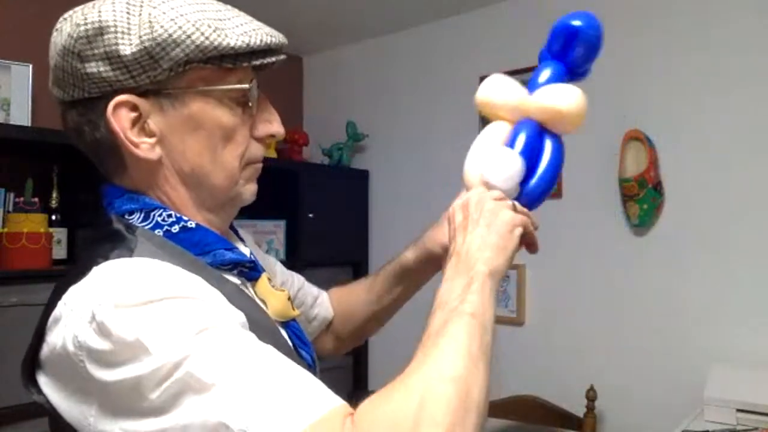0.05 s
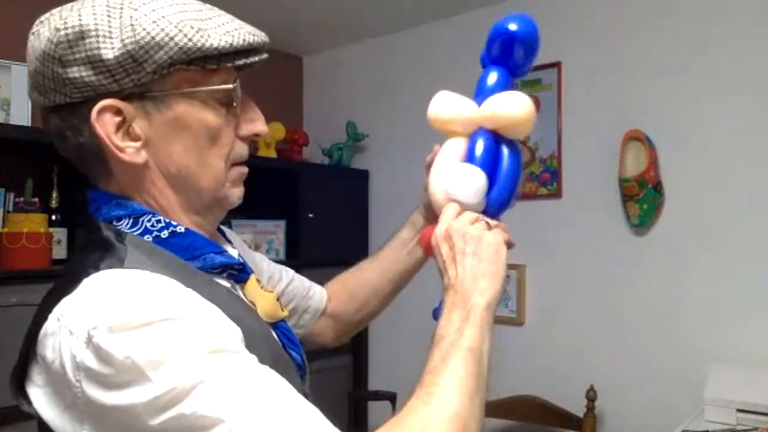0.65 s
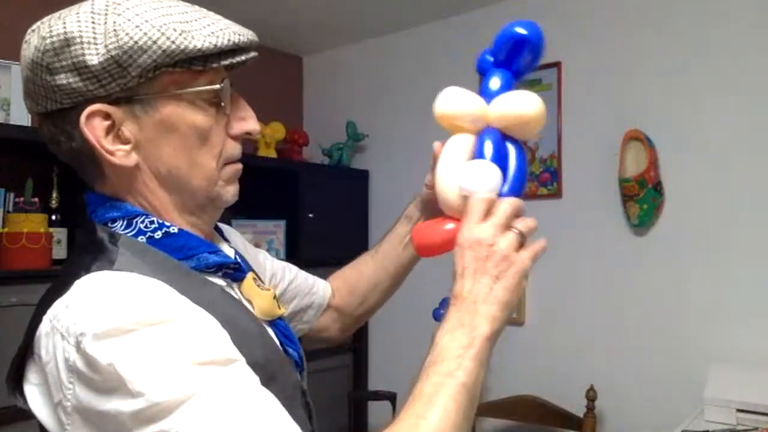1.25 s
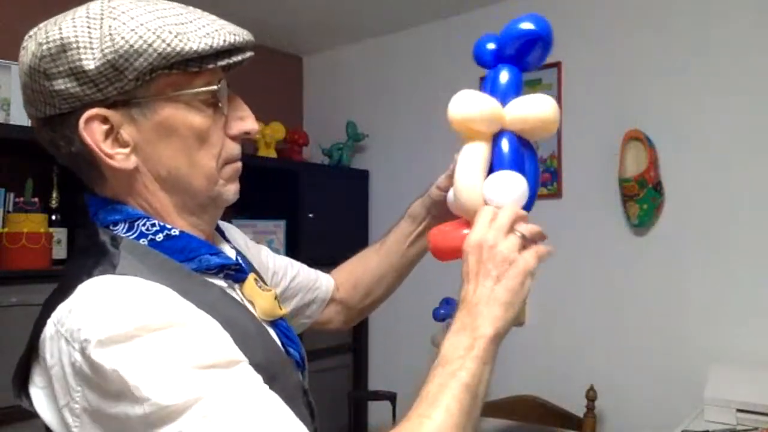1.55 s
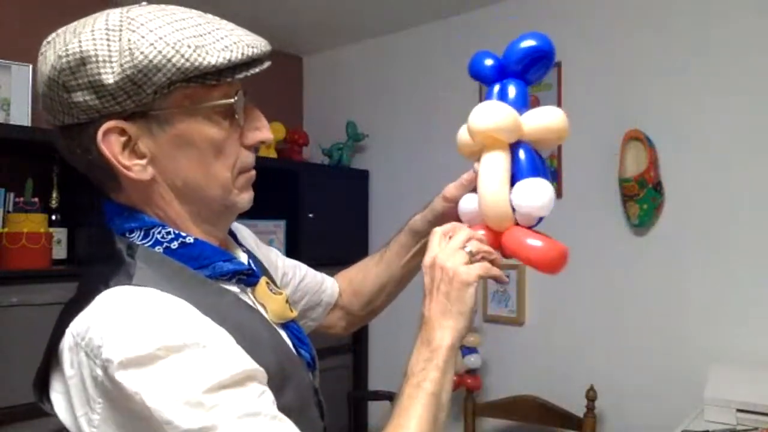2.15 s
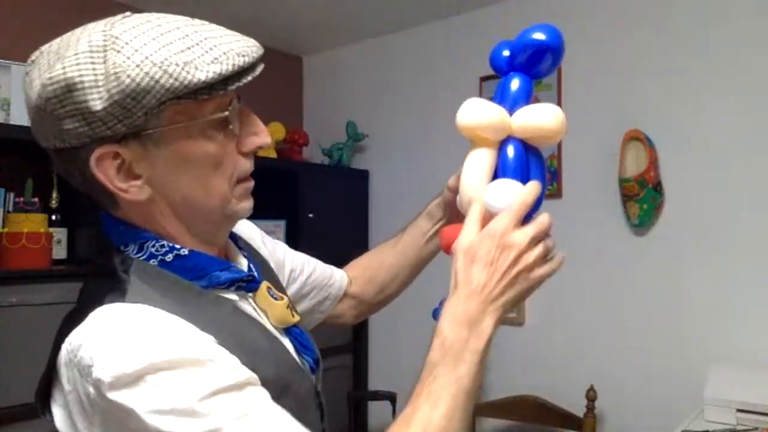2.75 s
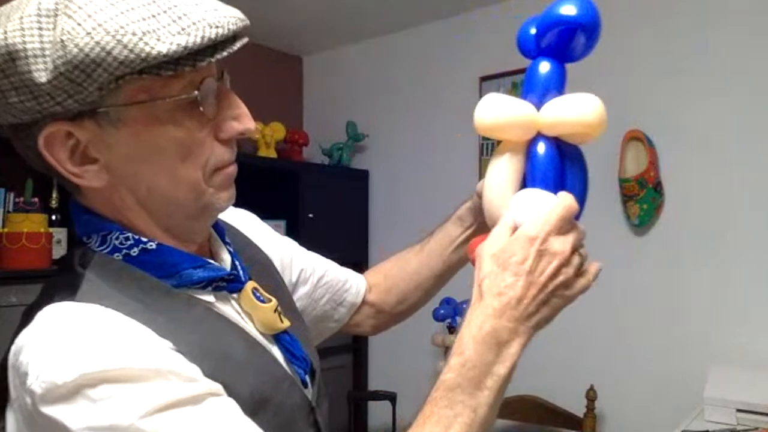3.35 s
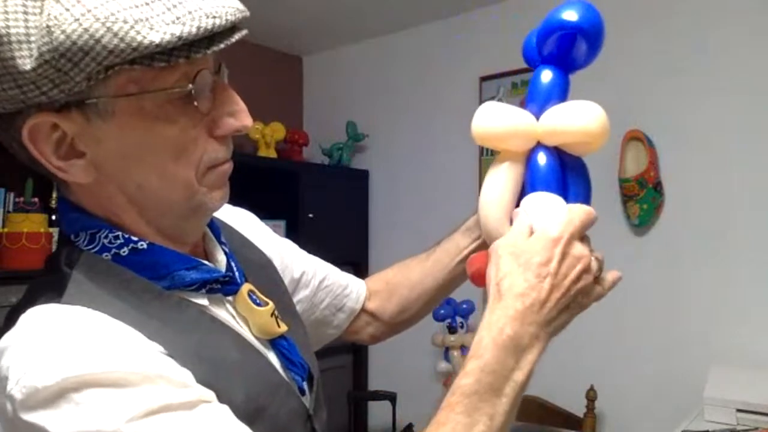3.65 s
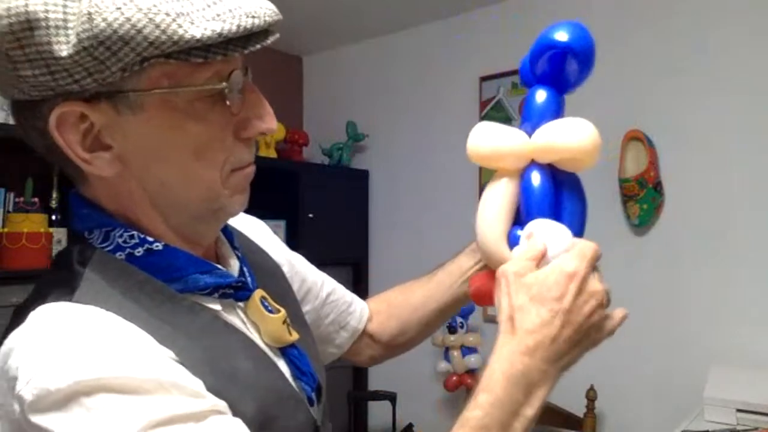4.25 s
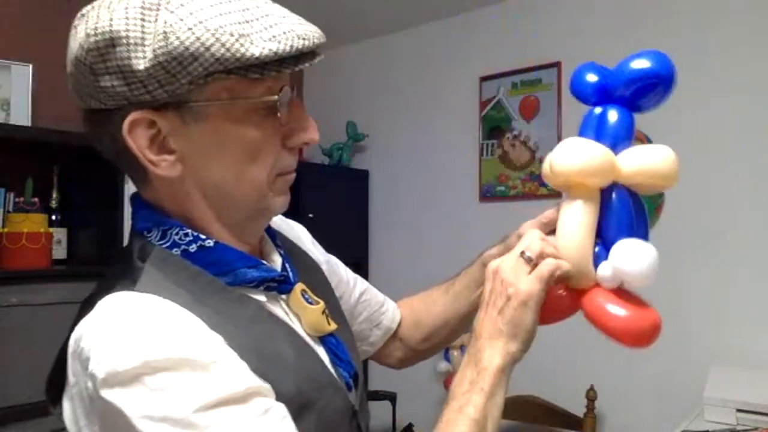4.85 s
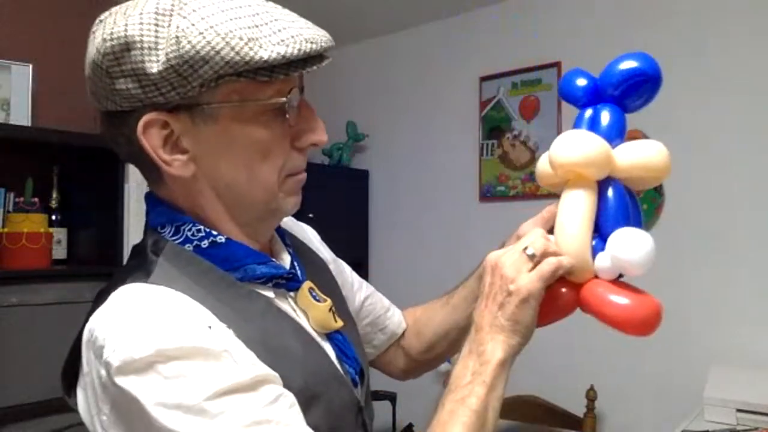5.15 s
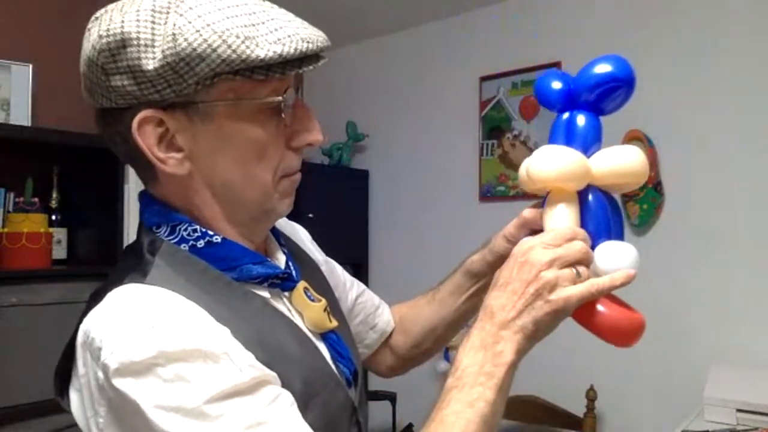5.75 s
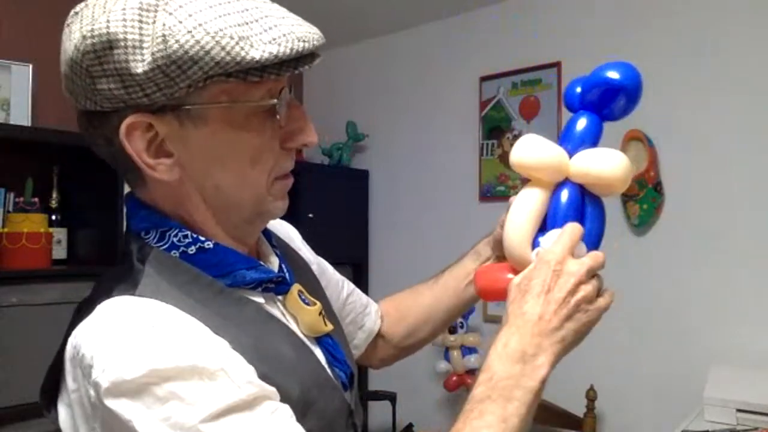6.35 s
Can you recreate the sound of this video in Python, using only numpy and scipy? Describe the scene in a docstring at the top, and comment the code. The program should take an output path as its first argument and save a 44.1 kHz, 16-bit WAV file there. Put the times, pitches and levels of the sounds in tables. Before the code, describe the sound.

Latex balloons rub against each other nearby as someone works them into a figure. Scratchy squeaks and hollow creaks come in stops and starts, mixed with quick chirps, some high and some low, and sharp little slips. Short pauses separate the twists, and the handling is busier in the second half. The small room is otherwise quiet and has a slight echo.

```python
"""Latex balloons squeak and creak as hands twist and press a balloon figure nearby, in a small room.
Latex sticks and slips on latex hundreds of times a second; each slip rings the skin and the air inside.
A light touch squeals, a hard grip slows to a creak, and stuck spots let go in sudden jerks.
The walls add a short echo, and a faint hush lies behind it all."""
import sys
import numpy as np
from scipy import signal
from scipy.fft import rfft, irfft
from scipy.io import wavfile
from scipy.ndimage import uniform_filter1d

SR = 44100
rng = np.random.default_rng(int(sys.argv[2]) if len(sys.argv) > 2 else 0)


def to_wav(sig):
    """Store sig (one row per channel, or 1-D mono) as 16-bit WAV at the path in sys.argv[1].

    Samples outside -1..1 are clipped; the rate is SR.
    """
    pcm = np.clip(np.atleast_2d(sig), -1, 1) * 32767
    pcm = np.round(pcm).astype(np.int16)
    wavfile.write(sys.argv[1], SR, pcm.T)  # frames by channels


N = 282240
TIME = np.arange(N) / SR


def gain_of(db):
    """Turns decibels into a number to multiply a sound by."""
    return 10 ** (np.asarray(db) / 20)


def unit_level(x):
    """Scales a sound to an average power of 1."""
    return x / np.sqrt(np.mean(x ** 2) + 1e-20)


def power(x, seconds):
    """How strong a sound is at each moment: its square, averaged over a short time."""
    return np.abs(uniform_filter1d(x ** 2, max(int(seconds * SR), 1))) + 1e-14


def look_up(table, hz):
    """Reads between the rows of a (pitch_hz, value) table, with octaves evenly spaced."""
    pitches_hz, values = np.transpose(table)
    return np.interp(np.log(hz + 1), np.log(pitches_hz + 1), values)


def wander(per_s):
    """A smooth random curve that changes about per_s times a second."""
    hz = np.fft.rfftfreq(N, 1 / SR)
    return unit_level(irfft(rfft(rng.standard_normal(N)) * np.exp(-(hz / per_s) ** 2), N))


def blend(a, b, share):
    """Mixes two unrelated sounds; share is how much of the power comes from b."""
    return np.sqrt(1 - share) * a + np.sqrt(share) * b


def resonate(x, hz, width_hz):
    """Makes a sound ring at a moving pitch; a smaller width rings longer."""
    turn = np.exp(2j * np.pi * np.cumsum(hz) / SR)
    fade = np.exp(-np.pi * width_hz / SR)
    return (turn * signal.lfilter([np.sqrt(2 * (1 - fade * fade))], [1, -fade], x / turn + 1e-18)).real


def add_ring(x, pitches_hz, width_hz, share):
    """Moves a share of a sound's power into a few ringing pitches, keeping its level."""
    ring = sum(resonate(x, hz, width_hz) for hz in pitches_hz)
    target = power(x, .03)
    mix = blend(x, ring * np.sqrt(target / power(ring, .03)), share)
    return mix * np.sqrt(target / power(mix, .03))


# The tone of the room's hush. Columns: pitch_hz, relative_db
HUSH_TONE = [(30, -22), (250, -8), (1000, -2), (16000, -15)]
def room_hush(level_db=-56.5):
    """The quiet room: faint, steady noise."""
    tone = gain_of(look_up(HUSH_TONE, np.fft.rfftfreq(N, 1 / SR)))
    return gain_of(level_db) * unit_level(irfft(rfft(rng.standard_normal(N)) * tone, N))


# How long the echo takes to fade by 60 dB. Columns: pitch_hz, fade_s
ECHO_FADES = [(150, 0.16), (1000, 0.21), (4000, 0.2), (14000, 0.15)]
def room_echo(x, first_s=0.0019, bounces_per_s=3000, patterns=5, changes_per_s=28):
    """Sound bounces off the walls and dies away; the pattern of bounces changes as the figure moves."""
    echo, size = np.zeros(N), SR // 2
    for k in range(patterns):
        signs = rng.choice([-1., 1.], size)
        bounces = signs * (rng.random(size) < bounces_per_s / SR) * (TIME[:size] > first_s)
        hz, t, bands = signal.stft(bounces, SR, nperseg=256)
        fade = gain_of(-60 * t / look_up(ECHO_FADES, hz)[:, None])
        tail = signal.istft(bands * fade, SR, nperseg=256)[1]
        away = np.abs((changes_per_s * TIME - k + patterns / 2) % patterns - patterns / 2)
        weight = np.cos(np.pi / 2 * np.minimum(away, 1))  # each pattern fades into the next
        echo += signal.oaconvolve(x * weight, tail / np.linalg.norm(tail))[:N]
    return echo


# Moments when a balloon sings one note. Columns: start_s, length_s, pitch_hz, level_db
SQUEALS = [(0.522, 0.053, 3500, -42.5), (0.673, 0.03, 3590, -29.5), (0.742, 0.028, 1390, -17.5),
           (0.883, 0.049, 3380, -29.5), (0.91, 0.031, 1770, -24), (1.1, 0.039, 1109, -26),
           (1.156, 0.028, 3770, -31.5), (1.283, .02, 584, -41.5), (1.671, 0.024, 1049, -27),
           (1.961, 0.036, 3200, -36), (2.263, 0.033, 2733, -39.5), (2.419, 0.041, 2800, -37.5),
           (3.59, 0.047, 287, -31), (4.02, 0.035, 2300, -28), (4.045, 0.03, 255, -29),
           (4.187, 0.061, 3780, -25.5), (4.19, 0.059, 860, -27), (4.67, 0.029, 395, -28.5),
           (4.53, 0.053, 1240, -23.5), (5.072, 0.048, 233, -27), (5.498, 0.023, 3180, -34),
           (5.649, 0.051, 232, -28.5), (6.01, 0.035, 3170, -32.5), (6.018, 0.029, 4600, -29),
           (6.074, 0.043, 580, -22)]
def squeals(slips, width_hz=110, waver=0.03, overtone_step_db=-10, top_hz=5599):
    """The slips lock on to one of a balloon's own notes: a wavering ring with up to three overtones."""
    out = np.zeros(N)
    bend = 1 + waver * wander(45)
    for start_s, length_s, pitch_hz, level_db in SQUEALS:
        span = slice(round(start_s * SR), round((start_s + length_s) * SR))
        tones_hz = [k * pitch_hz for k in range(1, 5) if k * pitch_hz < top_hz]
        tones = [unit_level(resonate(slips[span], hz * bend[span], width_hz)) for hz in tones_hz]
        ring = sum(gain_of(overtone_step_db * k) * tone for k, tone in enumerate(tones))
        out[span] += gain_of(level_db) * unit_level(ring) * signal.windows.tukey(len(ring), .4)
    return out


# Stuck spots letting go. Air, thump and zip levels are counted from the skin's level.
# Columns: start_s, skin_db, air_db, thump_db, zip_db, fade_s
JERKS = [(0.116, -6.5, -6.5, -27, -1, 0.0006), (0.1341, -5, -3.5, -17, -9, 0.00084),
         (0.161, -11.5, 6, -17, -11, 0.0017), (0.196, -9.5, 6.5, -20, -11, 0.00082),
         (0.247, -14.5, -6, -27, -4, 0.041), (0.29, -12.5, -5, -24, -5, 0.017),
         (0.334, -10.5, -4, -17, -7.5, 0.014), (0.417, -11.5, -3.5, -27.5, -3, 0.017),
         (0.758, -9.5, -6, -27, -1, 0.0092), (1.522, -19, -9.5, -20, -1.5, 0.015),
         (1.823, -45, -11, -16, 12, 0.0038), (1.86, -42, -2, -20, 10, 0.0024),
         (1.965, -28, -11, -6.5, 8, 0.0013), (2.0597, -13, -4.5, -15, 6, 0.004),
         (2.4, -33.5, -2.5, -23, 3, 0.00072), (2.6, -19, -2.5, 0, 0.5, 0.002),
         (2.924, -52, -8, -23.5, 13, 0.002), (3.247, -27.0, -5, -29, 3, 0.024),
         (3.3042, -12.5, -5, -5, -4, 0.011), (3.482, -21, 1.5, -12, 5, 0.0023),
         (3.722, -11.5, -15, -24, -2, 0.0073), (3.753, -10, -14.5, -24, -1.5, 0.0069),
         (4.3441, -15.5, -1, -16, 9, 0.0013), (4.5259, -22, -8, -14.5, 14, 0.0015),
         (4.676, -22, -4.5, -14.5, -1, 0.018), (4.866, -40.5, -7, -18, 10, 0.0014),
         (5.13, -18.5, -2.5, -22, 8.5, 0.0028), (5.186, -9, -9, -16, 4.5, 0.0025),
         (5.328, -2.5, -8, -29, 0, 0.0009), (5.336, -16.5, -6, -19.5, 0.5, 0.0091),
         (5.378, -14, -6, -25, 1, 0.016), (5.4532, -10, -3, -26, 4, 0.0015),
         (5.467, -13.5, -14, -23, 3, 0.0033), (5.567, -19.5, -7, -21, 7.5, 0.0133),
         (5.871, -16, -7.5, -15, 6, 0.012), (6.0808, -11.5, -11, -14.5, -3, 0.0088),
         (6.358, -33.5, -8, -19, 8, 0.0028)]
def jerks(base_slips_per_s=430, db_per_octave=15, jitter=.07, boost_db=2.5, slip_count=40):
    """Each jerk is a dying run of slips; gives a row of clicks each for skin, air, thump and zip."""
    clicks = np.zeros((4, N))
    for start_s, skin_db, air_db, thump_db, zip_db, fade_s in JERKS:
        slips_per_s = base_slips_per_s * 2 ** (zip_db / db_per_octave)  # brighter jerks slip faster
        t = np.cumsum(np.exp(jitter * rng.standard_normal(slip_count))) / slips_per_s
        t -= t[0]
        sizes = np.exp(-t / fade_s)
        sizes *= np.sqrt(fade_s * SR / 2) / np.linalg.norm(sizes)  # longer jerks carry more energy
        at = np.round((start_s + t) * SR).astype(int)
        parts_db = boost_db + skin_db + np.array([0, air_db, thump_db, zip_db])
        clicks[:, at[at < N]] += gain_of(parts_db)[:, None] * sizes[at < N]
    return clicks


# Pushes and twists of the hands. Air, thump and zip levels are counted from the skin's level.
# Columns: start_s, length_s, rise_s, skin_db, air_db, thump_db, zip_db, skin_pitch_hz
RUBS = [(0, 0.059, 0.003, -18, -3, -15.5, -1.0, 3470), (0.05, 0.31, 0.13, -18.5, -1.5, -15.5, 0, 3020),
        (0.369, 0.12, 0.032, -24.5, -3, -22.0, -8, 3130),
        (0.514, 0.096, 0.03, -38.5, -11.5, -9.0, -7.5, 2870),
        (0.651, 0.065, 0.058, -27.0, -2.5, -18.5, -2, 2900),
        (0.742, 0.059, 0.0053, -20.5, 1, -18.0, -6, 2831),
        (0.807, 0.075, 0.0053, -24.5, -2.5, -27.5, -24.5, 3040),
        (0.901, 0.055, 0.018, -19.5, -1, -13.5, -19, 2810.0),
        (1.047, 0.079, 0.077, -26.5, 3.5, -20, -2, 2880), (1.152, 0.032, 0.028, -36.5, -2, -11.5, -9, 3501),
        (1.218, 0.089, 0.015, -43.0, -3.5, -11.0, 1.0, 3860.0),
        (1.386, 0.075, 0.03, -53, 3.5, -18, 3.5, 3320), (1.459, 0.12, 0.11, -20.5, -1.5, -14.0, -0.5, 3130),
        (1.6, 0.083, 0.017, -24.5, -5, -12.5, -3, 3105),
        (1.959, 0.066, 0.0091, -38.5, -11.5, -18.5, -4.5, 3183),
        (2.023, 0.094, 0.018, -23.5, -2, -17.0, 0, 3300),
        (2.228, 0.065, 0.054, -32.5, -11, -23.0, -6.5, 2853),
        (2.314, 0.039, 0.021, -43.5, -17, -22.5, -0.5, 2783),
        (2.402, 0.062, 0.033, -36.5, -18, -31.0, -9.5, 2810.0),
        (2.496, 0.11, 0.081, -18.0, -7.5, -17.0, -2.5, 3170),
        (2.65, 0.063, 0.016, -19.5, -4.5, -17.5, -3, 3137),
        (2.952, 0.14, 0.099, -23.5, 0.0, -11.5, 2.5, 3093),
        (3.093, 0.13, 0.012, -35.0, -3, -16.0, 0.0, 3301), (3.252, 0.1, 0.015, -25.0, 1.5, -18.5, 0, 2815),
        (3.347, 0.11, 0.021, -31.5, -5, -9.5, -3.5, 3160.0),
        (3.461, 0.181, 0.066, -20.5, 1, -10.5, 4, 3158), (3.681, 0.13, 0.1, -13.0, -6, -21.0, -1.5, 2950),
        (3.822, 0.099, 0.0097, -23.5, -1, -15.5, -6, 2847),
        (3.977, 0.086, 0.06, -27, -5, -13.5, -14, 2480.0), (4.114, 0.028, 0.011, -35.0, -6, -27.0, 0, 3199),
        (4.178, 0.13, 0.025, -23.0, -3, -17.5, 0.5, 3244),
        (4.33, 0.046, 0.031, -21.0, -2.0, -18.0, 2.5, 2927),
        (4.509, 0.1, 0.037, -18.5, -2.5, -13.0, 2, 2521), (4.643, 0.085, 0.026, -27.5, 0, -16.5, -21, 2809),
        (4.862, 0.084, 0.0042, -50.5, -12, -20.0, 5.5, 2857),
        (4.933, 0.056, 0.027, -38.0, -5, -11.5, 4.5, 2754),
        (4.991, 0.11, 0.023, -15.0, -5.5, -20.5, 2.5, 3174),
        (5.101, 0.27, 0.024, -19.5, -4.5, -13.5, 0, 3162),
        (5.437, 0.055, 0.032, -19.5, -9.5, -18.0, -2.5, 3235),
        (5.569, 0.052, 0.011, -17.5, -0.5, -18.0, 1.0, 3059),
        (5.619, 0.079, 0.03, -18.0, -3.5, -9.5, -5, 2800), (5.716, 0.054, 0.007, -21.5, 1, -16, 0.5, 2641),
        (5.782, 0.071, 0.011, -32, -1, -26.0, 0.5, 2690.0),
        (5.87, 0.064, 0.009, -20.5, -16.5, -21.5, -3, 3484),
        (6.004, 0.064, 0.047, -28.0, -21, -24.5, -3.5, 2976),
        (6.042, 0.099, 0.021, -24.0, 0, -8.0, -5, 2670), (6.354, 0.047, 0.022, -32.5, -4.5, -6, 5, 2780)]
def rubs(sag_db_per_s=20, stop_db_per_s=700, tail_s=.2, rest_db=-100, rest_hz=2800):
    """Each rub swells, tires and stops; gives the four parts' levels in dB and the skin's pitch."""
    energy = np.full((4, N), gain_of(rest_db) ** 2)
    weighted_pitch = energy[0] * rest_hz
    for start_s, length_s, rise_s, skin_db, *others_db, pitch_hz in RUBS:
        span = (TIME >= start_s) & (TIME < start_s + length_s + tail_s)
        t = TIME[span] - start_s
        swell = np.minimum(t / rise_s, 1)
        fade_db = sag_db_per_s * t + stop_db_per_s * np.maximum(t - length_s, 0)
        parts_db = skin_db + np.r_[0, others_db][:, None] - fade_db
        rub_energy = (swell * gain_of(parts_db)) ** 2
        energy[:, span] += rub_energy
        weighted_pitch[span] += rub_energy[0] * pitch_hz  # where rubs overlap, the stronger one leads
    return 10 * np.log10(energy), weighted_pitch / energy[0]


def stick_slip(grip_db, usual_slips_per_s=290, usual_grip_db=-16, db_per_octave=13, uneven_db=3):
    """Latex catches and lets go, one click a slip; a harder grip slips less often."""
    octaves = (usual_grip_db - grip_db) / db_per_octave
    octaves = octaves + .55 * wander(28) + .22 * wander(400)  # slow sway and quick jitter
    slips_per_s = np.clip(usual_slips_per_s * 2 ** octaves, 55, 1500)
    slips_so_far = np.floor(np.cumsum(slips_per_s) / SR)
    slips = np.diff(slips_so_far, prepend=0) * np.sqrt(SR / slips_per_s)
    slips *= gain_of(uneven_db * rng.standard_normal(N) + wander(69))
    return slips / np.sqrt(power(slips, .045))


# The tone of one slip of latex. Columns: pitch_hz, relative_db
LATEX_TONE = [(40, -49), (150, -22), (225, -18), (400, -11), (700, -7.5), (1090, -2.5), (1400, -6.5),
              (3440, -6), (7650, -11.5), (12600, -1.5), (15800, -1.5)]
def slip_sound(clicks, low_hz, high_hz, hiss_share, gain_db=-1.5, slide_s=0.00099, size=4096):
    """Slips click and briefly hiss as they slide, heard through one part of the balloon."""
    fade = np.exp(-1 / (slide_s * SR))
    hiss_power = signal.lfilter([1 - fade], [1, -fade], clicks ** 2 + 1e-20)
    hiss = np.sqrt(hiss_power) * rng.standard_normal(N)
    hz = np.abs(np.fft.fftfreq(size, 1 / SR)) + 1
    edge_cut = np.sqrt((1 + (low_hz / hz) ** 18) * (1 + (hz / high_hz) ** 18))
    tone = gain_of(look_up(LATEX_TONE, hz)) / edge_cut
    # turn that tone into a short ring with a sharp start
    spectrum = np.exp(np.conj(signal.hilbert(np.log(tone + 1e-5))))
    ring = np.fft.ifft(spectrum).real[:size // 2]
    ring /= np.linalg.norm(ring)
    return gain_of(gain_db) * signal.oaconvolve(blend(clicks, hiss, hiss_share), ring)[:N]


def balloons(air_hz=1060, thump_hz=295, zip_hz=12500, light_touch_db=-34, hard_grip_db=-22):
    """Rubs and jerks shake the skin, the air inside, the whole body (thump) and the rubbed spot (zip)."""
    parts_db, skin_hz = rubs()
    skin_db, _, thump_db, _ = parts_db
    slips = stick_slip(grip_db=thump_db - skin_db)  # a hard grip thumps more
    skin_clicks, air_clicks, thump_clicks, zip_clicks = slips * gain_of(parts_db) + jerks()
    # the skin's notes move as it stretches; a light touch lets them ring most
    notes_hz = np.outer(np.arange(2, 6) / 3, skin_hz * np.exp(.09 * wander(18)))
    ring_share = np.interp(skin_db, [light_touch_db, hard_grip_db], [.8, .25])
    skin = slip_sound(skin_clicks, low_hz=1438.5, high_hz=5599, hiss_share=1)
    skin = add_ring(skin, notes_hz, width_hz=170, share=ring_share)
    skin = add_ring(skin, [skin_hz], width_hz=1700, share=.036)
    # squeezing shifts the air's hollow ring and the body's boom
    air = slip_sound(air_clicks, low_hz=594.5, high_hz=1455, hiss_share=.33)
    air = add_ring(air, [air_hz * np.exp(.08 * wander(20))], width_hz=77, share=.3)
    thump = slip_sound(thump_clicks, low_hz=42.5, high_hz=562.5, hiss_share=.99)
    thump = add_ring(thump, [thump_hz * np.exp(.23 * wander(20))], width_hz=34, share=.4)
    # the tiny rubbed spot chirps very high as it stretches and lets go
    zips = slip_sound(zip_clicks, low_hz=4920, high_hz=15500, hiss_share=1, gain_db=1.16)
    zips = add_ring(zips, [zip_hz * np.exp(.26 * wander(90))], width_hz=320, share=.29)
    return skin + air + thump + zips + squeals(slips)


def scene(direct_db=-4, echo_db=-3):
    """The balloons, their echo and the room's hush, in one channel."""
    direct = balloons()
    return (gain_of(direct_db) * direct + gain_of(echo_db) * room_echo(direct) + room_hush())[None]


def record(dry, quiet_below_db=-32, range_db=18, max_cut_db=15, ceiling=0.7, top_hz=16050):
    """Turns quiet moments down (a noise gate), flattens the tallest peaks and cuts the highest treble."""
    level_db = 10 * np.log10(power(dry[0], 0.02))
    cut_db = max_cut_db * np.clip((quiet_below_db - level_db) / range_db, 0, 1)
    clipped = np.clip(dry * gain_of(-cut_db), -ceiling, ceiling)
    low_pass = signal.firwin(401, top_hz, window=("kaiser", 8), fs=SR)
    return signal.oaconvolve(clipped, low_pass[None], "same")


dry = scene()
out = record(dry)
to_wav(out)
```